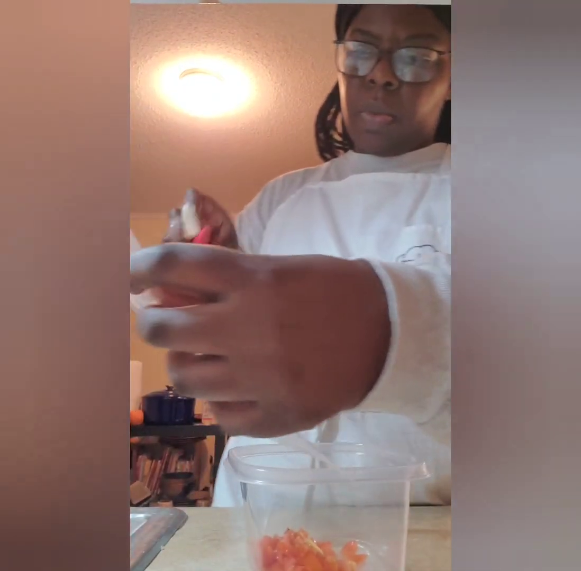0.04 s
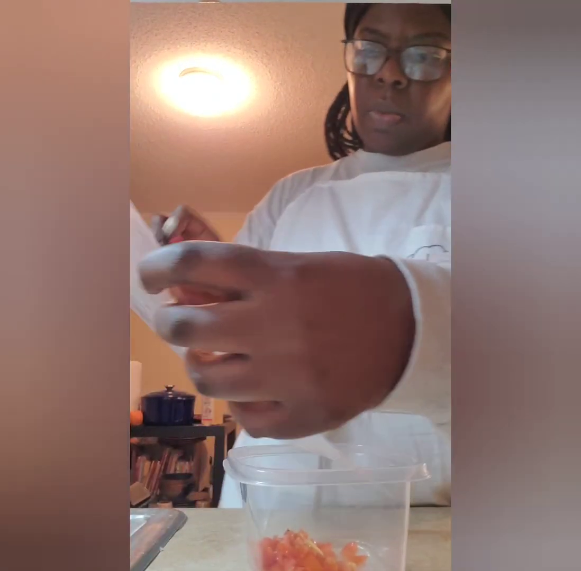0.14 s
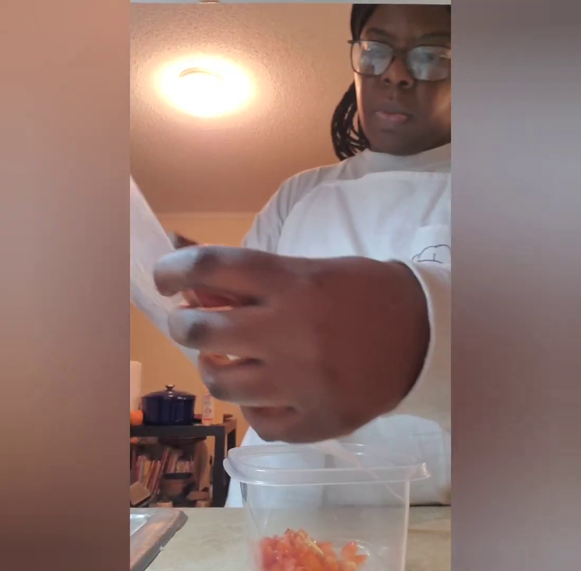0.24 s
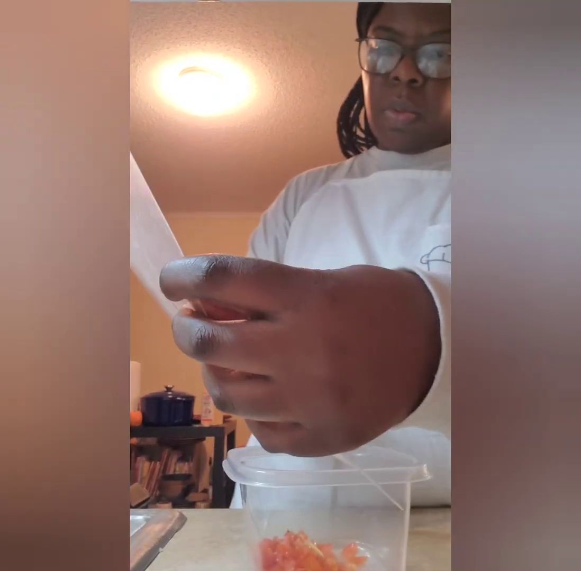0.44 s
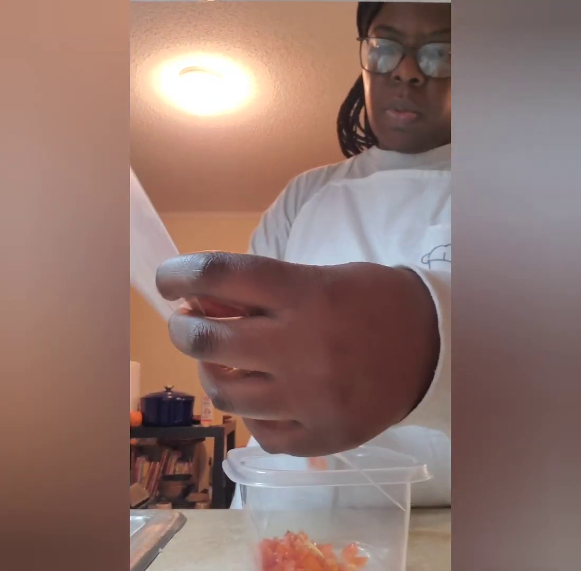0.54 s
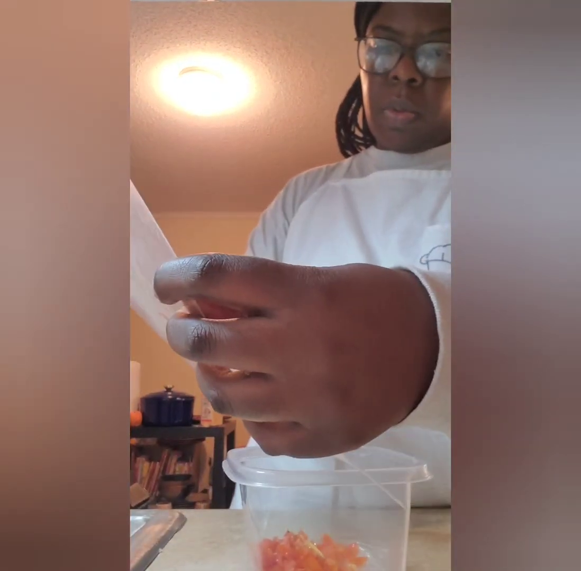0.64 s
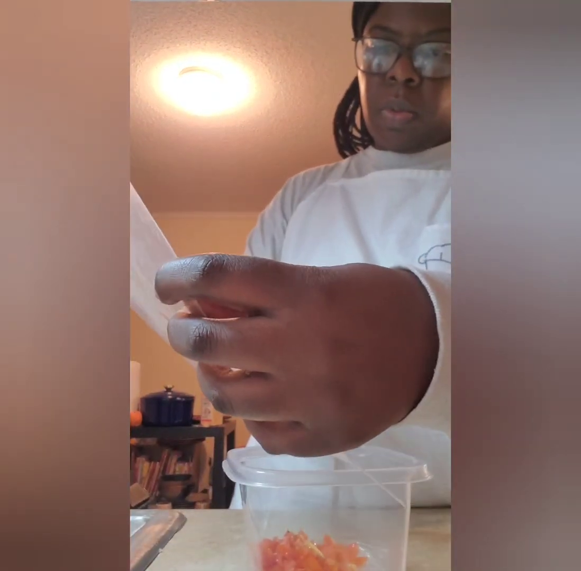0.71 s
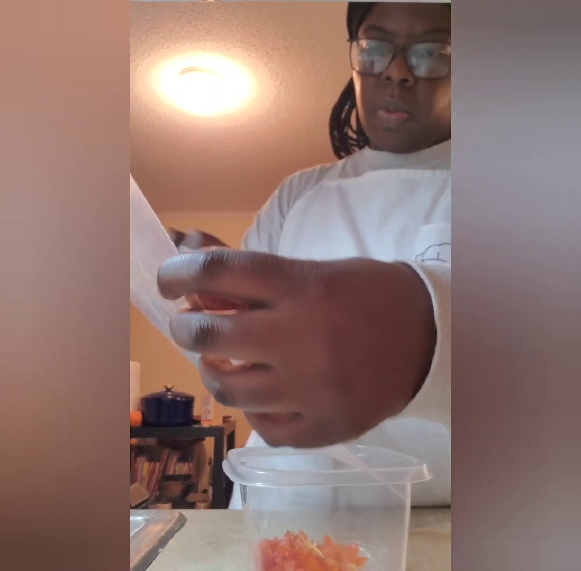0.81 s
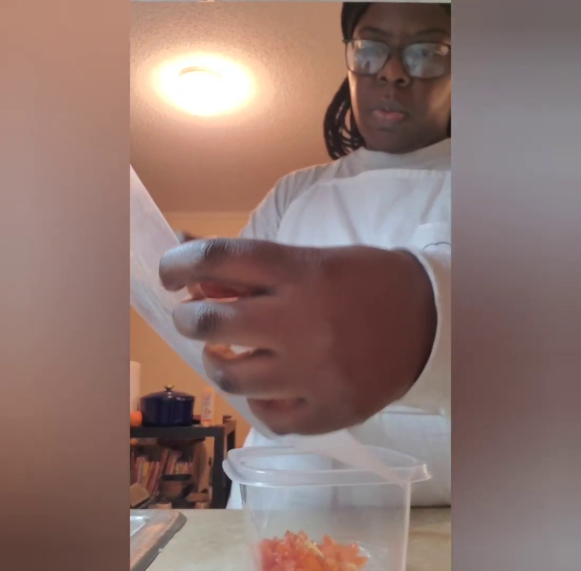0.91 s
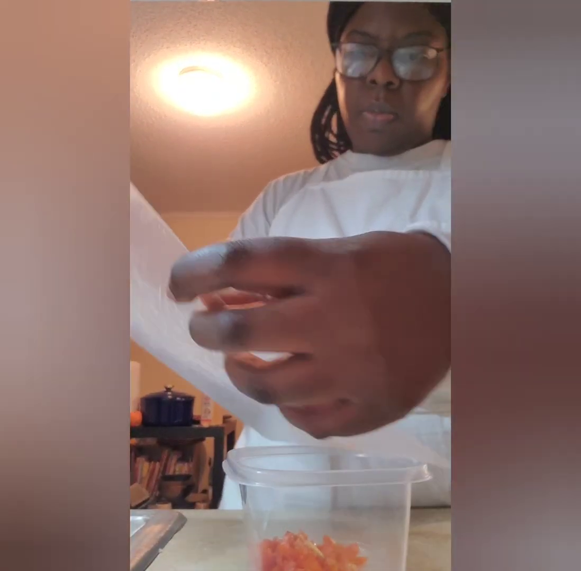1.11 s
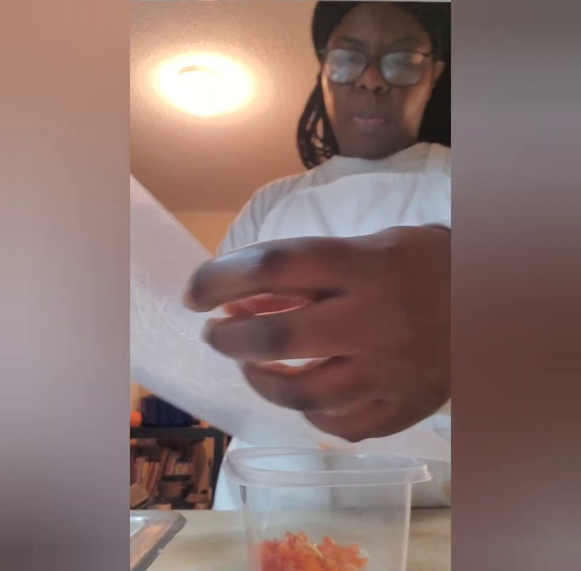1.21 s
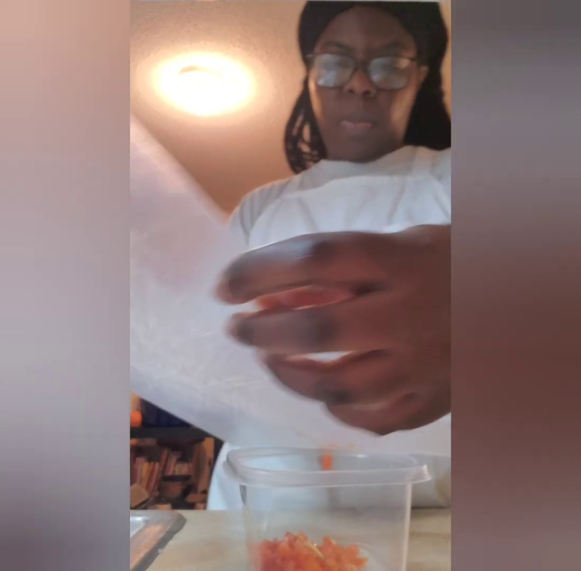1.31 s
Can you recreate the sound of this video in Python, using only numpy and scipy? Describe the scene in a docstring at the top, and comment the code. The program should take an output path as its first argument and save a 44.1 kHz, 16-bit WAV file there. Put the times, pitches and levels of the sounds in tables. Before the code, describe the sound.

A knife blade scrapes twice down a flexible plastic mat, crackling and raspy, in a small kitchen

```python
"""A knife blade scrapes twice down a flexible plastic mat, close to two microphone ports in a small kitchen.
Room noise and a fridge's hum run throughout. After one light touch the first stroke rasps, crackles and drums:
the edge slips and catches on the grain (random clicks, filtered bright) and rings the mat's modes.
Light touches and a low drumming fill the lift; a weaker second stroke and a last touch follow.
The source is nearer the right port; the left one hears it late and shaded."""
import sys
import numpy as np
from scipy import signal
from scipy.fft import rfft, irfft
from scipy.io import wavfile

SR = 44100
rng = np.random.default_rng(int(sys.argv[2]) if len(sys.argv) > 2 else 0)


def store_pcm(level_fs):
    """Save levels as 16-bit WAV."""
    pcm = np.round(np.clip(level_fs, -1, 1) * 32767).astype(np.int16)
    wavfile.write(sys.argv[1], SR, np.atleast_2d(pcm).T)


N = 59535

# Pressure of the blade in each stroke: [t/s, rasp level/dB, drumming level/dB,
# sizzle relative to the rasp/dB, hiss relative to the rasp/dB]
STROKE_PRESSURE = [
    [(.232, -36, -37, 7, 2.5), (.258, -40, -39.5, -1, -2), (.272, -33, -30, -3, 0),
     (.288, -30, -35.5, -1, -1), (.321, -45, -40, 2, 4.5), (.33, -31, -25, -2, 0.5),
     (.358, -31, -37, 1, -3), (.368, -22, -31.5, -1.5, -3.5), (.41, -26.5, -38, 3.5, -0.5),
     (.455, -23.5, -40.5, -0.5, -1.5), (.475, -45.5, -60, 13, 4), (.496, -45, -64, -13, -4),
     (.538, -60, -57, -5, 7.5), (.56, -66, -74, -6, -7)],
    [(.933, -42, -33, -9, 1.5), (.946, -32.5, -49, -1, 2), (.955, -31, -43, 7.5, 7),
     (.97, -44.5, -41, 9.5, 4.5), (.993, -36, -34, 9.5, 5.5), (1.01, -37.5, -42.5, 11.5, 3.8),
     (1.03, -35, -43.5, 8, 7), (1.05, -34, -31, 8.5, 4.5), (1.088, -36, -44, -2, 0.8),
     (1.112, -58, -62, -10.5, -14), (1.13, -65, -69.5, -6, -6)],
]
# Colour of the bending mat in each stroke and in the lift between: [t/s, lower rasp relative level/dB,
# upper drumming relative level/dB, low drumming level/dB]
MAT_BENDS = [
    [(.232, -2, 3, -34.5), (.266, 5, 1, -33), (.286, 3, 8.5, -40.5), (.314, 5, -4, -42), (.34, 5, 1.5, -51),
     (.365, -12.5, -2, -43), (.395, -4, -3.5, -38.5), (.41, -12, -7, -46.5), (.44, -13, -2.5, -56),
     (.458, 5.5, 3.5, -60), (.49, 10.5, -6, -59), (.56, 13, 1.5, -63)],
    [(.64, 0, 0, -54), (.66, 0, 0, -43), (.72, 0, 0, -54)],
    [(.933, -4, 8.5, -57), (.953, -26, -1, -59), (.977, 0, -5, -51), (1.001, 8.5, 6, -49.5),
     (1.035, -3, -6, -40.5), (1.055, 4, -6, -45.5), (1.089, 2.5, 5, -47), (1.13, 12, -2, -54)],
]
# The edge catches, lets go and rings briefly: [t/s, burst level/dB, ring f/Hz,
# sizzle relative to the burst/dB, drumming relative to the burst/dB]
EDGE_CATCHES = [(0.255, -36, 4030, 0, -9), (0.266, -21, 3700, -16, -11), (0.2815, -30, 4730, -2, -6),
                (0.2875, -26, 3800, 3, -5), (0.3271, -22, 3660, -16, 0), (0.3387, -17.5, 3630, -18, -14),
                (0.3513, -13, 3630, -8, -20), (0.3633, -11.5, 4200, -17, -14),
                (0.3666, -16, 4300, -13, -31), (0.3764, -12, 3100, -12, -3.5),
                (0.3792, -7.5, 4100, -11, -13), (0.3863, -7, 4180, -5, -23), (0.391, -14, 4200, -20, -17),
                (0.4024, -20, 2370, -15, -16), (0.4055, -7.5, 3080, -20, -14), (0.4117, -14, 3760, -15, -3),
                (0.421, -11, 2390, -13, -16), (0.427, -25, 2270, -9, -8), (0.433, -10.5, 3620, -17, -10),
                (0.4404, -15.5, 3700, -7, -4), (0.4483, -14, 2650, -9, -2.5),
                (0.4525, -11.5, 3730, -12, -34), (0.4595, -16.5, 4100, 3.5, -30),
                (0.467, -22.5, 2930, -11, -29), (0.5241, -31, 3020, 2.5, -16), (0.9516, -17, 3620, -1, -17),
                (0.9638, -22, 3500, 4, -3), (0.9814, -29.5, 3140, 3, -18), (1.0004, -24.5, 3000, 3, -17),
                (1.0031, -22.5, 3180, -4, -23), (1.0117, -24.5, 2970, -8, -25), (1.0152, -23, 3720, -8, -4),
                (1.0315, -28, 3930, 4, -21), (1.0324, -24, 4900, 10, -18), (1.0444, -26, 2820, -2, -3),
                (1.0504, -26, 3730, -4, 10), (1.058, -26, 3660, -9, -3), (1.0757, -32, 3800, -10, -9),
                (1.0864, -25.5, 2900, -15, -13)]
# Blade or mat touches something: [t/s, crack level/dB, sizzle relative to the crack/dB,
# knock level on the upper modes/dB, thud level on the low modes/dB]
LIGHT_TOUCHES = [(0.1685, -46, 0, -65, -64.5), (0.2331, -17, 2.5, -40, -19), (0.2345, -51, -13, -18.5, -47),
                 (0.6485, -53, -12, -58, -49), (.653, -46.5, -4, -52, -55), (0.6563, -41, -5, -41, -49),
                 (0.8734, -55, -20, -68, -79.5), (.9352, -28, -10, -28, -60),
                 (1.1832, -45, -20, -43.5, -61)]

SLIPS_PER_S, SLIP_SPREAD_DB = 14000, 2.0
FLUTTER_DB, FLUTTER_HZ = 1.6, 90
CATCH_GRAINS_PER_S, CATCH_RISE_S, CATCH_T60_S = 16000, 0.00085, 0.021
CATCH_CREST_DB = 3.5  # a burst's peak stands this far over its rms
RING_WIDTH_HZ, RING_DB, SPLASH_DB = 650, 2, -8  # a catch's ring and its broad splash
CRACK_T60_S = 0.014
RASP_FLOOR_HZ, RASP_TOP_HZ, SPLIT_HZ = 1910, 5130, 8600  # lower rasp | rasp | hiss | sizzle
PATCHY_DB, PATCH_HZ = 1.3, 70
RUBBED_FROM_HZ, UPPER_FROM_HZ = 420, 740  # rubbing drives only the modes above 420 Hz; those above 740 Hz take their own colour
DRUM_DB, LOW_DB = -22, -30.5
KNOCK_FROM_HZ, THUD_FROM_HZ = 330, 120
LEFT_LAG_S, LEFT_OWN_FROM_HZ = 0.00038, 1690  # the left treble comes from the far face
LEFT_BODY_SHARE = 0.22  # share of the far face in the rest of the left sound
ROOM_T60_S, ROOM_GAP_S, ROOM_CUT_HZ, ROOM_DB = 0.21, 0.0021, 10700, -10.5
AIR_TREBLE_HZ, HUM_WAVER_DB = 2000, 1.5
CUTOFF_HZ, TOP = 16200, 1.0  # TOP: full scale of the rounding


def scrape():
    """The blade on the mat: crackle of slips, catches and touches, with the drumming they excite."""
    dull = stroke_db(MAT_BENDS, axis=1)
    return slips(dull) + bursts(dull) + drumming() + flexing() + knocks_and_thuds()


def slips(dull_db):
    """Dense small slips of the pressed edge merge into a fluttering rasp, hiss and sizzle."""
    level, sizzle, hiss = (stroke_db(STROKE_PRESSURE, axis=k) for k in (1, 3, 4))
    clicks = grains(SLIPS_PER_S) * amp(FLUTTER_DB * drift(FLUTTER_HZ))
    low, mid, high = three_bands(clicks, dull_db)
    pressed = level != 0
    return pressed * amp(level) * (low + amp(hiss) * mid + amp(sizzle) * high)


def bursts(dull_db):
    """Catches and touches let out short runs of grains; each catch also rings."""
    s, db, _, sizzle_db, _ = np.transpose(EDGE_CATCHES)
    touch_s, crack_db, tip_db, _, _ = np.transpose(LIGHT_TOUCHES)
    source = grains(CATCH_GRAINS_PER_S)
    low, mid, high = three_bands(source, dull_db)
    level, hiss = amp(stroke_db(STROKE_PRESSURE, axis=4)), None
    hiss = level * mid
    catch = burst(s, db - CATCH_CREST_DB, CATCH_T60_S)
    crack = dying(marks(touch_s, crack_db), CRACK_T60_S)
    bright_catch = burst(s, db + sizzle_db - CATCH_CREST_DB, CATCH_T60_S)
    bright_crack = dying(marks(touch_s, crack_db + tip_db), CRACK_T60_S)
    splash = low * (amp(SPLASH_DB) * catch + crack)
    return rings(source) + splash + hiss * (catch + crack) + high * (bright_catch + bright_crack)


def rings(source):
    """Each catch colours a short run of grains with a resonance of its own."""
    out, size = np.zeros((2, N)), SR // 20
    t = np.arange(size) / SR
    r = np.exp(-np.pi * RING_WIDTH_HZ / SR)
    shape = amp(-60 * t / CATCH_T60_S) * (1 - np.exp(-t / CATCH_RISE_S))
    for s, db, hz, *_ in EDGE_CATCHES:
        i = int(s * SR)
        poles = [1, -2 * r * np.cos(2 * np.pi * hz / SR), r * r]
        tone = signal.lfilter([1, 0, -1], poles, source[:, i:i + size])
        tone = signal.lfilter([1, 0, -1], poles, tone)
        out[:, i:i + size] += amp(db - CATCH_CREST_DB + RING_DB) * shape * rms_one(tone)
    return out


def drumming():
    """Rubbing and catching drive the upper modes of the mat with sparse grains."""
    level, drum = (stroke_db(STROKE_PRESSURE, axis=k) for k in (1, 2))
    upper = stroke_db(MAT_BENDS, axis=2)
    s, db, _, _, drum_db = np.transpose(EDGE_CATCHES)
    pressure = (level != 0) * amp(drum + 2.0 * drift(33.3))
    rub = grains(1300) * (pressure + burst(s, db + drum_db - CATCH_CREST_DB, CATCH_T60_S))
    body = mat(rub, RUBBED_FROM_HZ, UPPER_FROM_HZ) + mat(amp(upper) * rub, UPPER_FROM_HZ, SR)
    return amp(DRUM_DB) * steep(body, RUBBED_FROM_HZ, "high")


def flexing():
    """The bending mat drums on its low modes, pushed by softened grains alike on both faces."""
    deep = stroke_db(MAT_BENDS, axis=3)
    push = grains(400)[0] * (deep != 0) * amp(deep)
    return amp(LOW_DB) * mat(signal.lfilter([.1], [1, -.97], push), 0, RUBBED_FROM_HZ)


def knocks_and_thuds():
    """Touches strike the mat: a softened blow on the upper modes, a sharp one on the low modes."""
    s, _, _, knock_db, thud_db = np.transpose(LIGHT_TOUCHES)
    blow = signal.lfilter([.2], [1, -.8], marks(s, knock_db))
    knocks = mat(blow, RUBBED_FROM_HZ, SR, struck=True)
    thuds = mat(marks(s, thud_db), 0, RUBBED_FROM_HZ, struck=True)
    return steep(knocks, KNOCK_FROM_HZ, "high") + steep(thuds, THUD_FROM_HZ, "high")


def mat(push, from_hz, to_hz, struck=False):
    """Modes within a range, rung by a push; a blow starts them in step, rubbing in alternating phase."""
    # Modes of the mat: [f/Hz, level/dB, t60/s]
    modes = [(82.8, -8.5, 0.16), (132.5, -1.5, 0.034), (213.7, -3, 0.079), (284.5, 1.5, 0.059),
             (343.6, 3, 0.053), (412, 0.5, 0.035), (490, -3, 0.03), (579, -1, 0.036), (686, 0, 0.03),
             (829, -1, 0.018), (1011, -0.5, 0.026), (1300, 2, 0.015), (1526, 1.5, 0.0086),
             (2000, -9.5, 0.012)]
    out = 0
    for k, (hz, db, t60) in enumerate(modes):
        if from_hz < hz <= to_hz:
            r, w = amp(-60 / (t60 * SR)), 2 * np.pi * hz / SR
            sign = 1 if struck else (-1) ** k
            ring = signal.lfilter([0, np.sin(w)], [1, -2 * r * np.cos(w), r * r], push + 1e-18)
            out = out + sign * amp(db) * ring
    return out


def three_bands(x, dull_db):
    """Rasp, hiss and sizzle of a crackle, levelled apart; the rasp's lower part moves on its own."""
    # Colour of the edge's crackle: [f/Hz, level/dB]
    edge_colour = [(470, -42), (900, -2.5), (1300, -4), (1800, -1), (2300, 3.5), (3200, 6.5), (4300, 3),
                   (5200, -2.5), (6900, 3), (7700, -13.5), (9000, -13), (10500, -4), (12200, 7),
                   (13800, -6), (16000, -19)]
    y = patchy(colour(x, edge_colour))
    rasp = rms_one(steep(y, RASP_TOP_HZ, "low"))
    hiss = rms_one(steep(y, [RASP_TOP_HZ, SPLIT_HZ], "band"))
    sizzle = rms_one(steep(y, SPLIT_HZ, "high"))
    lower = amp(dull_db) * steep(rasp, RASP_FLOOR_HZ, "low")
    return steep(rasp, RASP_FLOOR_HZ, "high") + lower, hiss, sizzle


def patchy(x):
    """Overlapping bands of a crackle flicker on their own, as different parts of the sheet radiate."""
    octave = np.log2(np.fft.rfftfreq(N, 1 / SR) / 500 + 1e-9)
    spectrum, out = rfft(x), 0
    for k in range(12):  # triangular bands, half an octave apart
        band = np.clip(1 - 2 * abs(octave - k / 2), 0, 1)
        out = out + amp(PATCHY_DB * drift(PATCH_HZ)) * irfft(spectrum * band, N)
    return out


def grains(per_s):
    """Random clicks of uneven size, one row for each face of the sheet; rms 1."""
    sizes = amp(SLIP_SPREAD_DB * np.minimum(rng.exponential(1, (2, N)), 4))
    sizes = sizes * rng.choice([-1, 1], (2, N))
    return rms_one(sizes * (rng.random((2, N)) < per_s / SR))


def ports(faces):
    """Right port hears the near face first, left one late and shaded with far-face treble; both hear the room."""
    # Shading on the way to the left port: [f/Hz, level/dB]
    left_shade = [(60, -9.5), (150, -5.5), (300, -2.5), (480, -5), (950, 1.5), (1320, 1.5), (1700, 2),
                  (2500, -6), (4000, -3), (6800, -9.5), (9000, -0.5), (12000, -12), (14500, -1),
                  (16000, 25)]
    near, far = faces
    sos = signal.butter(3, LEFT_OWN_FROM_HZ, "high", fs=SR, output="sos")
    near_top, far_top = signal.sosfiltfilt(sos, faces)
    body = (1 - LEFT_BODY_SHARE) * (near - near_top) + LEFT_BODY_SHARE * (far - far_top)
    left = np.pad(colour(body + far_top, left_shade)[0], (int(LEFT_LAG_S * SR), 0))[:N]
    return amp(-0.5) * (np.array([left, near]) + amp(ROOM_DB) * room((left + near) / 2))


def room(x):
    """Reverberation: an independent dying noise tail of unit energy for each port."""
    t = np.arange(int(.5 * SR)) / SR
    tails = rng.standard_normal((2, len(t))) * amp(-60 * t / ROOM_T60_S) * (t > ROOM_GAP_S)
    tails = signal.lfilter(*signal.butter(1, [250, ROOM_CUT_HZ], "band", fs=SR), tails)
    tails = tails / np.sqrt(np.sum(tails ** 2, axis=1, keepdims=True))
    return signal.fftconvolve([x] * 2, tails, axes=1)[:, :N]


def room_noise():
    """Air and motor noise, alike in both ports in the bass; its treble sinks and returns."""
    # Colour of the noise: [f/Hz, level/dB]
    air_colour = [(20, -8), (49, -3), (116, -10), (150, -7.5), (228, -19.5), (347, -17), (400, -24.5),
                  (472, -17), (700, -29), (1000, -29), (1710, -32.5), (3000, -39), (6900, -38), (8200, -55),
                  (10000, -49), (12300, -40.5), (14500, -49.5), (16000, -51)]
    # Likeness of the two ports: [f/Hz, correlation]
    likeness = [(30, 1), (130, .98), (290, 1), (640, 0.58), (1410, -0.13), (3100, 0.031), (6820, 0.0017),
                (15000, 0.25)]
    # Course of the noise: [t/s, level/dB, treble relative level/dB]
    air_level = [(0, -43.5, 1.2), (.2, -43, .3), (0.598, -46, 1), (.75, -47, -2.5), (0.902, -48.5, -5),
                 (1.16, -46.5, 1.7), (1.35, -48, -1)]
    hz = np.fft.rfftfreq(N, 1 / SR)
    mid, side = rfft(rng.standard_normal((2, N))) * amp(at_hz(air_colour, hz)) * (hz > 15)
    alike = np.clip(at_hz(likeness, hz), -1, 1)
    pair = np.sqrt(1 + alike) * mid + np.sqrt(1 - alike) * side * [[1], [-1]]
    both = rfft(rms_one(irfft(pair, N)))
    s, db, treble_db = np.transpose(air_level)
    level, treble = (amp(np.interp(np.arange(N) / SR, s, c)) for c in (db, treble_db))
    share = 1 / (1 + (AIR_TREBLE_HZ / (hz + 1)) ** 2)  # part of the spectrum that is treble
    return level * (irfft(both * (1 - share), N) + treble * irfft(both * share, N))


def fridge():
    """Steady tones that waver a little in level."""
    # Fridge tones: [f/Hz, rms level/dB]
    tones = [(145.5, -56.5), (237, -62.5), (339.5, -63), (474, -67), (592.3, -62), (710.6, -66.5)]
    t, out = np.arange(N) / SR, 0
    for hz, db in tones:
        level = np.sqrt(2) * amp(db + HUM_WAVER_DB * drift(2))
        out = out + level * np.sin(2 * np.pi * (hz * t + rng.random()))
    return out


def amp(db):
    """Gain of a level in dB."""
    return 10 ** (np.asarray(db) / 20)


def rms_one(x):
    """Scaled to rms 1."""
    return x / np.sqrt(np.mean(x ** 2) + 1e-20)


def at_hz(points, hz):
    """A table read on a log-frequency axis."""
    p = np.array(points)
    return np.interp(np.log(np.maximum(hz, 1)), np.log(p[:, 0]), p[:, 1])


def colour(x, points):
    """Causal (minimum-phase) filter with the dB response of a table, by folding its cepstrum."""
    size = 4096
    cep = irfft(np.log(amp(at_hz(points, np.fft.rfftfreq(size, 1 / SR)))))
    cep[1:size // 2] *= 2
    cep[size // 2 + 1:] = 0
    return signal.fftconvolve(np.atleast_2d(x), irfft(np.exp(rfft(cep)))[None], axes=1)[:, :N]


def steep(x, hz, kind):
    """Butterworth filter of design order four."""
    return signal.sosfilt(signal.butter(4, hz, kind, fs=SR, output="sos"), x)


def drift(rate_hz):
    """Slow random wander of rms 1."""
    r = np.exp(-2 * np.pi * rate_hz / SR)
    noise = rng.standard_normal(N + SR)
    return rms_one(signal.lfilter([1], [1, -2 * r, r * r], noise)[SR:])  # first second settles


def stroke_db(strokes, axis):
    """A column of stroke tables over time; zero between the strokes."""
    t, out = np.arange(N) / SR, 0
    for stroke in strokes:
        p = np.array(stroke)
        out = out + np.interp(t, p[:, 0], p[:, axis], left=0, right=0)
    return out


def marks(times, db):
    """One click for each event."""
    out = np.zeros(N)
    out[(np.asarray(times) * SR).astype(int)] = amp(db)
    return out


def dying(clicks, t60):
    """Each click starts an envelope that dies away exponentially."""
    return signal.lfilter([1], [1, -amp(-60 / (t60 * SR))], clicks + 1e-18)


def burst(times, db, t60):
    """Envelopes with a short rise and a dying tail."""
    r = np.exp(-1 / (CATCH_RISE_S * SR))
    return signal.lfilter([1 - r], [1, -r], dying(marks(times, db), t60))


def scene():
    """Scrape at the two ports over the kitchen's background."""
    return ports(scrape()) + room_noise() + fridge()


def record(dry):
    """Peaks are rounded, then the top is cut steeply."""
    rounded = TOP * np.tanh(dry / TOP)
    return signal.sosfilt(signal.cheby2(20, 80, CUTOFF_HZ, fs=SR, output="sos"), rounded)


dry = scene()
out = record(dry)
store_pcm(out)
```